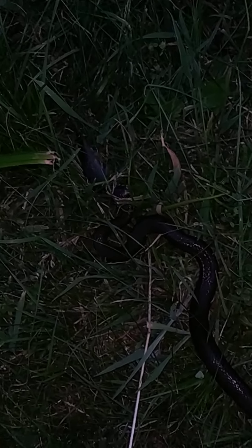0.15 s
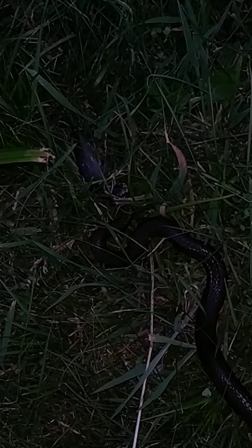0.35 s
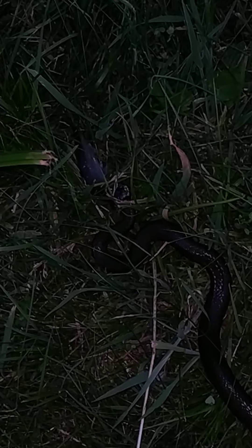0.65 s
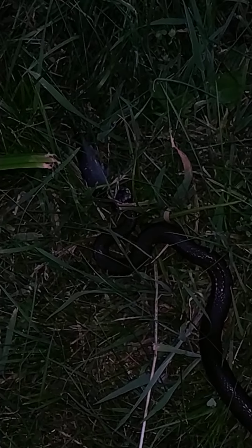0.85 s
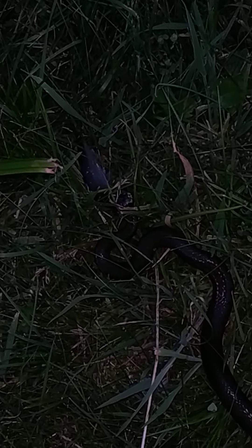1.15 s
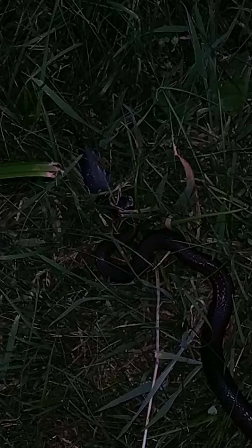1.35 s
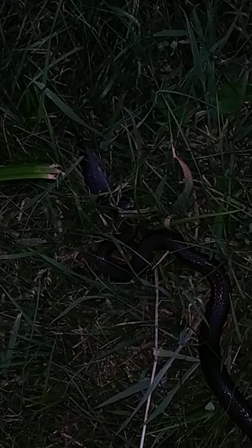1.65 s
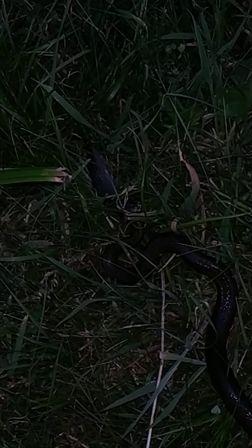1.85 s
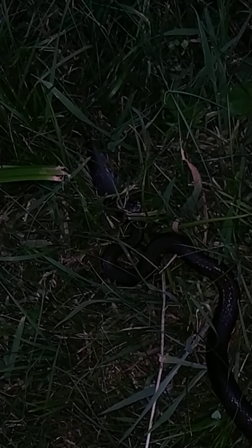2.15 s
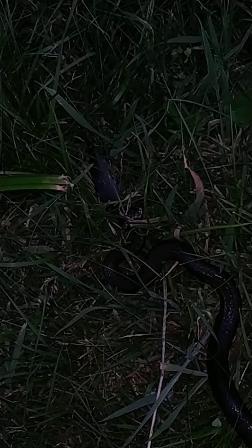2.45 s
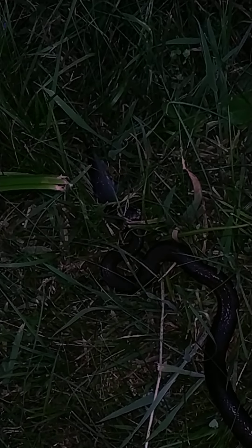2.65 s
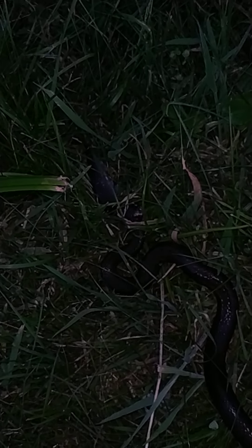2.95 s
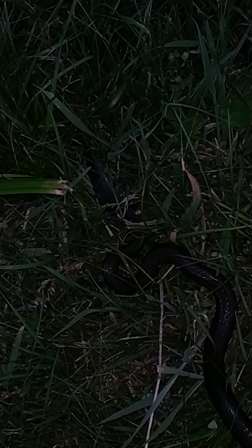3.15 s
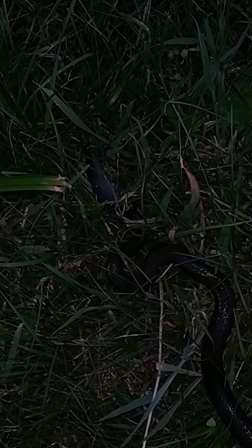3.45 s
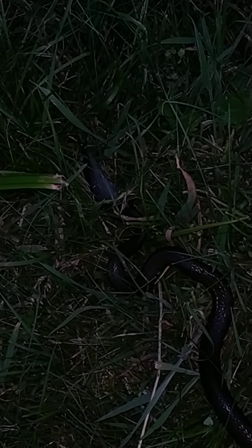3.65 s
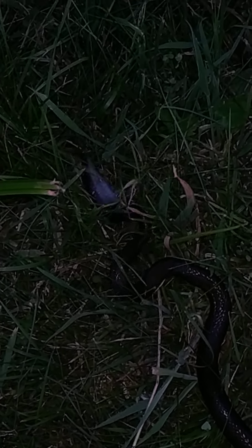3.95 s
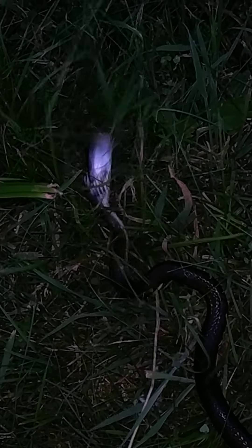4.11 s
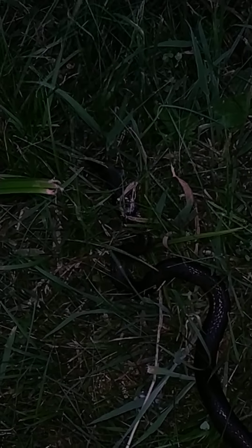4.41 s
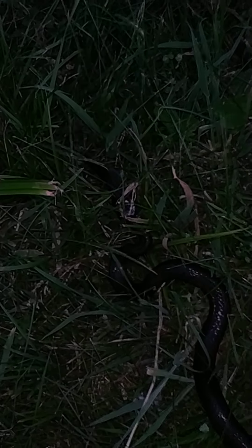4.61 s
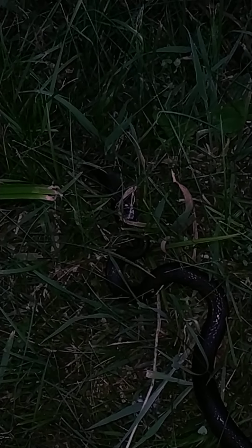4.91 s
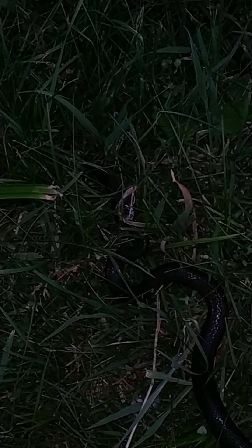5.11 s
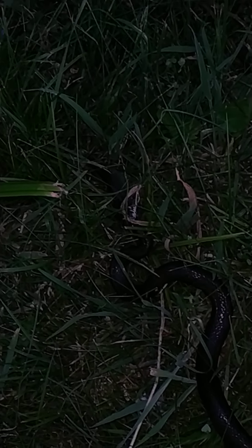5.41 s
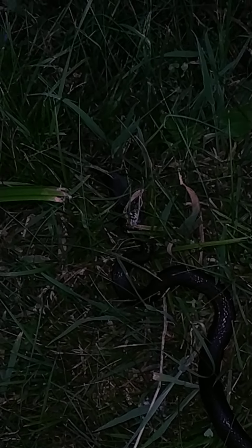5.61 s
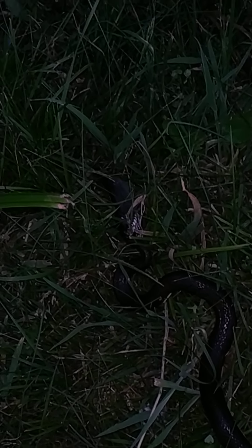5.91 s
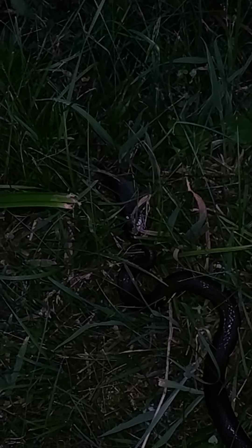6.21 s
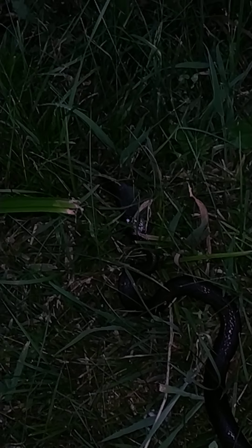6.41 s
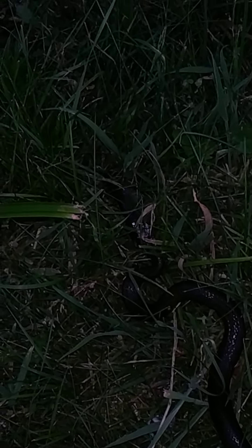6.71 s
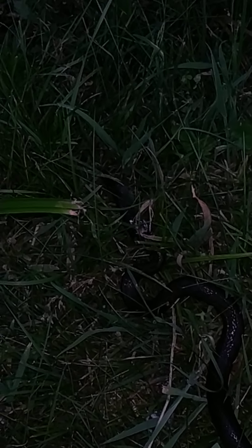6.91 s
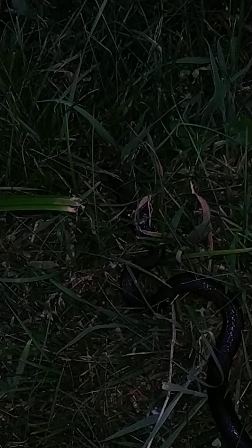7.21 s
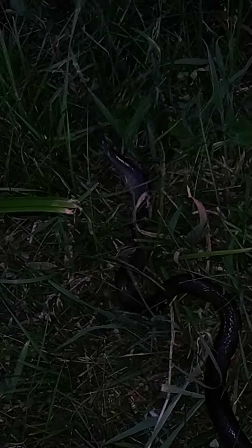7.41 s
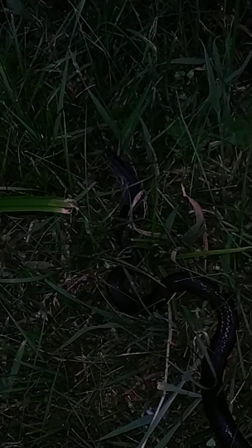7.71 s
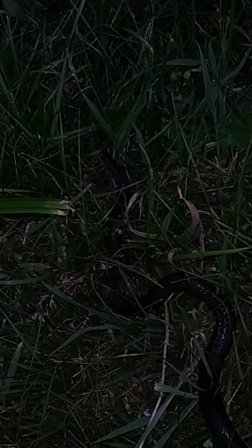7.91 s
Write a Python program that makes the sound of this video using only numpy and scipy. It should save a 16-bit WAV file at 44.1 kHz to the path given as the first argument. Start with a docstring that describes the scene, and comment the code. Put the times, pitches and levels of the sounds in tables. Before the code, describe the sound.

Close, irregular rustling and crackling of a snake in damp grass, busy at first, then sparse, with one late burst over faint outdoor hush.

```python
"""A snake pushes through grass and dry stems on soft, damp ground, close to the microphone.
Each shove drags blades over its scales: random clicks and hiss, filtered into a grainy rustle.
Stems snap as filtered bursts with a hard crack; wet soil squelches as short sine tones that rise in pitch.
Behind it lie a quiet outdoor hush of filtered noise and a faint far whistle, perhaps a bird, of wavering sines."""
import sys
import numpy as np
from scipy import signal
from scipy.io import wavfile

SR = 44100
rng = np.random.default_rng(int(sys.argv[2]) if len(sys.argv) > 2 else 0)


def store_pcm(level_fs):
    """Save levels as 16-bit WAV."""
    pcm = np.round(np.clip(level_fs, -1, 1) * 32767).astype(np.int16)
    wavfile.write(sys.argv[1], SR, np.atleast_2d(pcm).T)


N = 355446

# The snake's shoves, each a build-up, a hold and a release; levels are relative:
# (start of hold [s], build-up [s], hold [s], release [s],
#  brushing of blades [dB], crush of litter [dB], glide of scales [dB])
SHOVES = [(0, 0.046, 0.054, 0.19, -55, -55, -55), (0.21, .14, 0.19, 0.33, -41, -40, -46),
          (0.527, .04, 0.055, 0.17, -48.5, -54, -52), (0.791, 0.084, 0.027, 0.088, -45.5, -45.5, -58),
          (0.902, 0.091, 0.079, 0.12, -56, -56, -63), (1.237, 0.16, 0.0096, 0.46, -48, -53, -56),
          (1.464, 0.072, 0.12, 0.22, -45.5, -54, -55), (1.766, 0.11, 0.36, 0.1, -56, -60, -63.5),
          (2.056, 0.017, 0.01, 0.11, -67, -46, -67), (2.21, 0.09, 0.075, 0.13, -55, -55.5, -58.5),
          (4.06, 0.097, 0.056, 0.17, -57.5, -67, -56), (4.562, 0.026, 0.0304, .3, -54.5, -58, -63),
          (6.614, 0.078, 0.045, 0.13, -53, -53, -51), (6.754, 0.25, 0.093, 0.14, -39.5, -38.5, -46),
          (6.9, 0.033, 0.07, 0.062, -46.5, -45.5, -49), (7.323, 0.13, 0.043, 0.083, -54.5, -62, -56.5),
          (7.521, 0.6, 0.079, 0.085, -59.5, -60, -64)]
# Stems snapping at set times, some loud, some faint, levels relative to each other;
# positive left-right is louder on the left:
# (time [s], level [dB], pitch [Hz], bandwidth [octaves], time to fade 60 dB [s], left-right [dB])
TIMED_SNAPS = [(0.0332, -47, 5940, 3.3, .035, 8), (0.214, -31.5, 2772, 0.62, 0.015, 2),
               (0.2352, -46, 5980, 1.54, 0.034, 0), (0.262, -36.5, 8430, 1.7, .035, 4),
               (0.275, -37, 2670, 0.46, .025, 0), (0.409, -39, 7500, 0.63, .03, 0),
               (0.449, -33, 9050, 1.6, 0.06, -2), (0.4595, -35, 10000, 0.91, 0.041, -1.5),
               (0.7245, -35.5, 4300, 0.94, 0.08, 0), (0.782, -31.5, 2910, 0.51, 0.024, 2.5),
               (0.967, -46.5, 2830, 1.14, 0.019, 4), (0.985, -44.5, 2695, 0.87, .03, 0),
               (1.172, -41, 5490, 2.1, 0.037, 0), (1.2266, -41, 12600, .8, 0.055, -2),
               (1.4338, -29, 5440, 2.13, 0.025, 2), (1.479, -31, 3800, 1.5, 0.028, -1),
               (1.5065, -31.5, 5190, 2.7, 0.046, -2), (1.536, -39, 4006, 1.97, .02, 0),
               (1.5515, -35.5, 6460, 2.6, .022, -.5), (1.661, -41.5, 3420, 1.1, 0.054, 3),
               (1.703, -42.5, 5890, 0.25, 0.025, -1), (1.766, -44.5, 3520, 2.25, 0.026, 1),
               (1.8704, -42, 3650, 1.3, .045, 3), (2.053, -40.5, 8250, 1.35, 0.061, -2.5),
               (2.1236, -46, 2810, 1.5, 0.024, 0), (2.2068, -38, 5390, 1.95, 0.041, -2),
               (2.2224, -42, 6920, 0.72, .015, -1), (2.2884, -44, 6100, 0.94, 0.013, -1),
               (2.324, -43, 6700, 0.5, .012, -0.5), (3.0755, -44, 4960, 0.42, 0.014, 0),
               (3.0974, -54, 2480, 1.9, 0.043, 2), (3.1385, -50.5, 3500, 3.3, 0.052, -1),
               (3.2295, -51, 3320, 1, .014, 0), (3.235, -41.5, 8950, 0.63, 0.028, -2),
               (4.052, -50, 8300, 0.84, 0.018, 5), (4.558, -35.5, 2530, 2.07, 0.021, 1),
               (4.5665, -39, 3200, 0.43, 0.012, 5), (4.575, -37.5, 2980, 2.5, .022, -3),
               (4.589, -39.5, 5220, 0.5, 0.082, 2), (4.6501, -36, 6370, 0.57, 0.023, 1),
               (4.77, -49.5, 4940, 2.3, 0.031, -1), (5.284, -34.5, 9200, 0.83, 0.055, -5),
               (5.2912, -25.5, 6370, 0.29, 0.011, 2.5), (5.36, -49, 8900, 0.66, .026, -1),
               (5.7941, -38.5, 11250, 0.45, 0.0081, -1), (6.3109, -48.5, 9080, 1.5, 0.036, 1),
               (6.616, -45, 5010, 2.9, 0.026, 9), (6.7755, -30, 2787, 2, 0.019, -1),
               (6.8884, -28.5, 3965, 2, 0.028, -2), (6.899, -31.5, 2620, 2.6, 0.012, -2),
               (6.9196, -29, 2830, 1.25, 0.021, 0), (7.099, -48.5, 7860, 2.2, 0.079, -5),
               (7.2735, -50, 2570, 2.2, 0.02, 5), (7.324, -45, 7770, 0.41, 0.013, 0),
               (7.364, -55, 2945, 2.9, 0.053, 7.5), (7.5688, -44, 3470, 1.5, 0.07, 0)]
# Air pockets opening in the wet soil at set times, strong and faint, levels relative to each other:
# (time [s], starting pitch [Hz], peak level [dB], time to fade 60 dB [s])
TIMED_SQUELCHES = [(0.2235, 785, -32.5, 0.024), (0.2345, 545, -29.5, .018), (0.2394, 714, -29, 0.016),
                   (0.2505, 757, -22.5, 0.012), (0.264, 440, -39, 0.03), (0.279, 770, -35, 0.016),
                   (0.303, 1220, -31, 0.016), (0.333, 1270, -38, 0.016), (0.3445, 940, -27, .008),
                   (0.3628, 930, -23, 0.0087), (0.372, 826, -25.5, 0.014), (0.3798, 822, -20, 0.01),
                   (0.39, 760, -23, 0.01), (0.4015, 780, -22, 0.0082), (0.4216, 650, -30, 0.016),
                   (0.4311, 587, -32, 0.034), (0.459, 976, -29.5, 0.012), (0.467, 1190, -32, .011),
                   (0.4812, 1110, -33.5, 0.0098), (0.5495, 987, -35.5, 0.026), (0.570, 1030, -36.5, .014),
                   (0.7848, 1024, -28.5, 0.02), (0.7946, 615, -30, 0.041), (0.812, 1145, -35.5, 0.014),
                   (0.8738, 774, -34.5, 0.0066), (0.9208, 839, -39.5, 0.012), (0.9505, 990, -40.5, 0.011),
                   (0.968, 950, -36, 0.014), (1.1475, 1100, -43, 0.012), (1.173, 1337, -43.5, 0.017),
                   (1.251, 1250, -34, 0.037), (1.326, 2230, -39.5, 0.017), (1.359, 1221, -40, 0.0097),
                   (1.3853, 1210, -34.5, 0.013), (1.4435, 854, -39.5, 0.016), (1.4525, 1437, -38, 0.014),
                   (1.4837, 950, -33, 0.023), (1.5235, 965, -37, 0.0072), (1.5345, 1270, -33.5, 0.0096),
                   (1.549, 1010, -35, 0.012), (1.7725, 1854, -32.5, 0.017), (1.776, 705, -43, 0.018),
                   (1.8275, 1530, -37, 0.02), (1.8602, 1156, -40.5, 0.043), (1.935, 1900, -41.5, 0.018),
                   (1.943, 963, -46.5, .042), (1.9959, 1734, -33.5, 0.023), (2.039, 2110, -32.5, 0.0095),
                   (2.0638, 1045, -24.5, 0.011), (2.0652, 1855, -26.5, 0.012), (2.2007, 1513, -38, 0.013),
                   (2.217, 1765, -41, .02), (2.237, 1163, -48, .028), (2.2825, 1170, -28, 0.0068),
                   (4.558, 670, -42.5, 0.039), (4.559, 1890, -33, 0.0096), (4.7086, 1560, -48.5, 0.026),
                   (5.002, 463, -45, 0.012), (5.078, 600, -52, 0.12), (5.282, 550, -42.5, 0.094),
                   (6.552, 1976, -48.5, 0.02), (6.7635, 610, -33.5, 0.021), (6.7755, 790, -26, 0.013),
                   (6.7992, 729, -29, 0.014), (6.83, 684, -36, .014), (6.854, 687, -39, 0.013),
                   (6.8985, 610, -33.5, 0.023), (6.923, 660, -37, 0.019), (6.9528, 700, -30, 0.0079),
                   (7.5692, 1947, -44, 0.025), (7.611, 802, -52.5, 0.034)]
# The far whistles, levels before their fading:
# (time [s], length [s], starting pitch [Hz], final pitch [Hz], level [dB])
FAR_WHISTLES = [(6.314, 0.098, 3130, 3470, -64), (7.114, 0.18, 2870, 3030, -63),
                (7.845, 0.055, 2760, 2910, -66), (7.944, 0.14, 2950, 2970, -65.5)]
# Tone colour of the crushed litter: (frequency [Hz], relative level per Hz [dB])
LITTER_SPECTRUM = [(130, -33), (210, -4.5), (340, -13), (560, -3), (700, 0), (1300, 4), (1750, 1.5),
                   (2500, 1.5), (3600, -8), (6000, -24)]
# Tone colour of the brushed blades: (frequency [Hz], relative level per Hz [dB])
BLADE_SPECTRUM = [(1200, -15), (2400, 1.5), (3400, -1), (4500, -1.5), (6300, 4), (9000, -0.5), (12000, -7),
                  (16000, -10)]
# Tone colour of the outdoor hush: (frequency [Hz], relative level per Hz [dB])
HUSH_SPECTRUM = [(30, -48), (80, -26), (130, -33), (195, -1.5), (280, -2), (450, -6.5), (750, -8.5),
                 (1500, -11.5), (5000, -13), (15500, -12)]
# How alike left and right are for the close sounds: (frequency [Hz], correlation [-1 to 1])
NEAR_LIKENESS = [(150, 0.32), (400, 0.65), (950, 0.81), (2400, 0.53), (6000, 0), (15000, 0.19)]
# How alike left and right are for the hush: (frequency [Hz], correlation [-1 to 1])
HUSH_LIKENESS = [(60, 0.47), (380, 0.18), (950, 0), (15000, 0.004)]

TIME = np.arange(N) / SR   # seconds
CUTOFF_HZ = 15900
BAND_EDGES_HZ = np.geomspace(28, 17000, 23)
SHOVE_SWING_DB = 20   # how far the brushing climbs over a build-up and sinks over a release
CRUSH_STEEPNESS = 1.5   # the litter gives way only under weight, so it swells and fades faster
PRESSED_DB = -63   # the soil starts to give at this level of crush
# Pitch of the soil's hollows under a light touch, its fall with weight, and its lowest value
LIGHT_CAVITY_HZ, CAVITY_OCTAVES_PER_DB, LARGEST_CAVITY_HZ = 1794, 0.14, 797
SWELL_CYCLES = 1.17   # a pocket opens over about this many cycles
THIN_STEM_OCTAVES, THIN_STEM_T60_S = 0.52, 0.025   # bandwidth and ring of the random thin-stem snaps
STEM_RING_OCTAVES = 0.134   # width of the resonance of a broken stem
THICK_STEM_HZ, THUD_DB_PER_OCTAVE = 3010, 11   # thinner, higher stems knock the ground less


def shoves():
    """Levels of brushing, crushing and gliding: each shove builds, holds and lets go; overlaps add in power."""
    power = np.full((3, N), 1e-12)
    for s, build, hold, release, brush_db, crush_db, glide_db in SHOVES:
        before = np.maximum(s - TIME, 0) / build
        after = np.maximum(TIME - s - hold, 0) / release
        slack = before + after
        near = slack < 3
        slack_db = SHOVE_SWING_DB * slack[near]
        levels_db = [brush_db - slack_db, crush_db - CRUSH_STEEPNESS * slack_db, glide_db - slack_db]
        power[:, near] += from_db(levels_db) ** 2
    return 10 * np.log10(power)


def rustle(level_db, spectrum, per_s, spread_db, slide_db, catch_db, catch_rate, patchy_db):
    """Tiny slips over a smooth sliding hiss; they clump as blades catch and let go."""
    sources = []
    for _ in range(2):
        slips = grains(per_s, spread_db, size=N)
        hiss = from_db(slide_db) * rng.standard_normal((2, N))
        sources.append(slips + hiss)
    texture = coloured(sources, spectrum, NEAR_LIKENESS, patchy_db, patch_rate=70)
    clumped = texture * from_db(catch_db * drift(catch_rate))
    return from_db(level_db) * rms_one(clumped)


def crackles(brush_db, gain_db, low_hz, high_hz, width, spread_db, count):
    """Small dry blades flick past the scales under a firm push, each with a brief tick of its own pitch."""
    out, t = np.zeros((2, N)), TIME[:SR // 40]
    firm_db, t60 = -55, .025
    for when, pitch, size, side in rng.random((count, 4)):
        hz, i = low_hz * (high_hz / low_hz) ** pitch, int(when * N)
        if brush_db[i] > firm_db:
            noise = widen(rng.standard_normal((2, len(t))), at_hz(NEAR_LIKENESS, hz))
            burst = noise * from_db(-60 * t / t60)
            tick = rms_one(band(burst, hz * (1 - width), hz * (1 + width)))
            level = from_db(brush_db[i] + gain_db - spread_db * size)
            add(out, i / SR, level * pan(10 * (side - .5)) * tick)
    return out


def scale_hiss(glide_db, low_hz, flutter_db, per_s, spread_db):
    """The edges of the scales tick past the blades: a thin, airy crackle that comes in spurts."""
    ticks = rms_one(band(grains(per_s, spread_db, size=N), low_hz, CUTOFF_HZ))
    return from_db(glide_db + flutter_db * drift(90)) * ticks


def drag(crush_db, gain_db, half_width_octaves, wander_octaves, stick_db):
    """The belly sticks and slips; the slips ring a hollow whose pitch wanders and falls with weight."""
    centre_hz = cavity_hz(crush_db) * 2 ** (wander_octaves * drift(70))
    slips = widen(grains(500, 2, size=N), at_hz(NEAR_LIKENESS, 950))
    scrape = 0
    # Seven fixed bands fade in and out as the hollow's pitch passes them
    for hz in np.geomspace(540, 2200, 7):
        nearness = np.exp(-(np.log2(hz / centre_hz) / half_width_octaves) ** 2)
        scrape = scrape + nearness * band(slips, hz * .87, hz * 1.15)
    return from_db(crush_db + gain_db + stick_db * drift(45)) * rms_one(scrape)


def cavity_hz(crush_db):
    """Pitch of the hollows: more weight opens larger, lower ones, down to the largest that the soil holds."""
    weight_db = np.maximum(crush_db - PRESSED_DB, 0)
    hz = LIGHT_CAVITY_HZ * 2 ** (-CAVITY_OCTAVES_PER_DB * weight_db)
    return np.maximum(hz, LARGEST_CAVITY_HZ)


def snaps(rows, gain_db, crack_db, ring_db, splinter_db, thud_db, tail_db, tail_t60, attack_s):
    """A stem cracks hard amid tearing fibres and rings at its pitch, then its neighbours shiver."""
    out, t = np.zeros((2, N)), TIME[:SR // 6]
    for s, db, hz, octaves, t60, side_db in rows:
        half_band, half_ring = 2 ** (octaves / 2), 2 ** (STEM_RING_OCTAVES / 2)
        bend_s = attack_s * THICK_STEM_HZ / hz   # thick stems bend for longer before they break
        shiver = from_db(tail_db - 60 * t / tail_t60)
        fade = (1 - np.exp(-t / bend_s)) * (from_db(-60 * t / t60) + shiver)
        cracks = widen(grains(7000, 1.5, size=len(t)), at_hz(NEAR_LIKENESS, hz)) * fade
        cracks[:, int(bend_s * SR)] += from_db(crack_db)
        cracks = stem_echo(cracks, lag_s=0.001396, share=1.0)

        stem = rms_one(band(cracks, hz / half_band, hz * half_band, order=3))
        ring = from_db(ring_db) * rms_one(band(cracks, hz / half_ring, hz * half_ring))
        splinters = from_db(splinter_db) * rms_one(band(cracks, hz / half_band, CUTOFF_HZ, order=3))
        octaves_thinner = np.log2(max(hz / THICK_STEM_HZ, 1))
        thud_gain = from_db(thud_db - THUD_DB_PER_OCTAVE * octaves_thinner)
        thud = thud_gain * rms_one(band(cracks, 410, 2600))
        add(out, s, from_db(db + gain_db) * pan(side_db) * (stem + ring + splinters + thud))
    return out


def random_snaps(brush_db, gain_db, ceiling_db, low_hz, high_hz, spread_db, count):
    """Thin stems give way at random wherever the body is pushing; one row for each, as for the timed ones."""
    rows, moving_db = [], -57
    for when, pitch, size, side in rng.random((count, 4)):
        push_db = brush_db[int(when * N)]
        if push_db > moving_db:
            db = min(push_db + gain_db, ceiling_db) - spread_db * size
            hz = low_hz * (high_hz / low_hz) ** pitch
            rows.append((when * N / SR, db, hz, THIN_STEM_OCTAVES, THIN_STEM_T60_S, 10 * (side - .5)))
    return rows


def stem_echo(x, lag_s, share):
    """A reflection off a neighbouring stem combs the spectrum, differently at each side."""
    lags = rng.uniform(lag_s / 4, lag_s, 2)
    t = TIME[:x.shape[1]]
    return np.array([side + share * np.interp(t - lag, t, side, left=0) for side, lag in zip(x, lags)])


def squelches(rows, gain_db, rise, width, spatter_db, spatter_t60):
    """Wet pockets: longer ones climb further in pitch; shorter ones burst with a stronger wet spatter."""
    out, t = np.zeros((2, N)), TIME[:SR // 12]
    for (s, hz, db, t60), side in zip(rows, rng.standard_normal(len(rows))):
        pocket = bubble(hz, t60, rise * np.sqrt(t60 / 0.121))
        add(out, s, from_db(db + gain_db) * pan(width * side) * pocket)
        drops = widen(grains(1500, 1.9, size=len(t)), at_hz(NEAR_LIKENESS, hz))
        drops = drops * from_db(-60 * t / spatter_t60)
        spatter = rms_one(band(drops, hz * 0.85, hz * 1.38))
        add(out, s, from_db(db + spatter_db - 220 * t60) * spatter)
    return out


def random_squelches(crush_db, gain_db, ceiling_db, spread_db, t60, count):
    """Pockets open at random under the body, within half an octave of the pitch of the hollows."""
    rows = []
    for when, pitch, size in rng.random((count, 3)):
        weight_db = crush_db[int(when * N)]
        if weight_db > PRESSED_DB:
            hz = cavity_hz(weight_db) * 2 ** (pitch - .5)
            db = min(weight_db + gain_db, ceiling_db) - spread_db * size
            rows.append((when * N / SR, hz, db, t60))
    return rows


def seeping(crush_db, gain_db, low_hz, high_hz, cycles, spread_db, count):
    """Many small pockets burst at random, louder where the litter is pressed harder."""
    out = np.zeros((2, N))
    for when, pitch, size, side in rng.random((count, 4)):
        hz, i = low_hz * (high_hz / low_hz) ** pitch, int(when * N)
        db = crush_db[i] + gain_db - spread_db * size
        add(out, i / SR, from_db(db) * pan(12 * (side - .5)) * bubble(hz, cycles / hz, rise=2.34))
    return out


def bubble(hz, t60, rise):
    """An air pocket swells, rings and climbs in pitch; longer-lived ones hold more, then die more abruptly."""
    t = TIME[:int(t60 * SR)]
    pitch = hz * (1 + rise * (t / t60) ** 2)
    swell = 1 - np.exp(-(t * hz / SWELL_CYCLES) ** 2)
    fade = from_db(-60 * (t / t60) ** (1.85 + 2.5 * t60))
    return np.sin(2 * np.pi * np.cumsum(pitch) / SR) * swell * fade


def undergrowth(x, t60, wet_db):
    """Stems and ground scatter a short diffuse tail, different at each side."""
    t = TIME[:SR // 4]
    noise = band(rng.standard_normal((2, len(t))), 390, 8300, order=1)
    scatter = noise * from_db(-60 * t / t60) * (t > .002)   # the tail starts after 2 ms
    scatter /= np.sqrt(np.sum(scatter ** 2, axis=1, keepdims=True))
    return x + from_db(wet_db) * signal.fftconvolve(x, scatter, axes=1)[:, :N]


def outdoor_hush(level_db, flutter_db):
    """Quiet, nearly steady noise, shaped band by band and spread wide."""
    noise = rng.standard_normal((2, 2, N))
    return from_db(level_db) * coloured(noise, HUSH_SPECTRUM, HUSH_LIKENESS, flutter_db, patch_rate=14)


def whistles(waver, fading_db):
    """Thin, wavering notes from far away that fade in and out on the air."""
    out = np.zeros((2, N))
    for s, length, first_hz, last_hz, db in FAR_WHISTLES:
        size = int(length * SR)
        wander = np.array([drift(114.0)[:size], drift(118.0)[:size]])   # left and right waver apart
        pitch = np.linspace(first_hz, last_hz, size) * (1 + waver * wander)
        arch = np.sqrt(np.abs(np.sin(np.linspace(0, np.pi, size))))
        swell = from_db(db + fading_db * drift(36.0)[:size]) * arch
        add(out, s, swell * np.sin(2 * np.pi * np.cumsum(pitch, axis=1) / SR))
    return out


def from_db(db):
    """Turn decibels into a gain."""
    return 10 ** (np.asarray(db) / 20)


def rms_one(x):
    """Scale each channel to an rms (average strength) of one."""
    return x / np.sqrt(np.mean(x ** 2, axis=-1, keepdims=True) + 1e-20)


def at_hz(points, hz):
    """Read a table of values against frequency on a log-frequency axis."""
    table = np.array(points)
    return np.interp(np.log(hz), np.log(table[:, 0]), table[:, 1])


def drift(rate):
    """A random wander of rms one: straight lines between `rate` random points a second."""
    knots = rng.standard_normal(int(N / SR * rate) + 3)
    return rms_one(np.interp(TIME * rate, np.arange(len(knots)), knots))


def band(x, low, high, order=2):
    """Band-pass filter: keep the frequencies between two limits in Hz."""
    high = min(max(high, low * 1.1), SR * .45)
    low = min(low, high * .9)
    return signal.sosfilt(signal.butter(order, [low, high], "band", fs=SR, output="sos"), x + 1e-18)


def widen(pair, alike):
    """Two unrelated signals become left and right with the given correlation."""
    alike = np.clip(alike, -1, 1)
    middle = np.sqrt(1 + alike) * pair[0]
    sides = np.sqrt(1 - alike) * pair[1] * np.array([[1], [-1]])
    return middle + sides


def pan(db):
    """Left and right gains for a level difference; positive is louder on the left."""
    return from_db(np.array([[db], [-db]]) / 2)


def add(out, s, sound):
    """Mix a sound in at a time in seconds."""
    i = max(round(s * SR), 0)
    out[:, i:i + sound.shape[1]] += sound[:, :N - i]


def grains(per_s, spread_db, size):
    """Two rows of random clicks of rms one; a wider spread makes a few stand out."""
    born = rng.random((2, size)) < per_s / SR
    clicks, count = np.zeros((2, size)), born.sum()
    heights = from_db(spread_db * np.minimum(rng.exponential(1, count), 4))
    clicks[born] = heights * rng.choice([-1, 1], count)
    return rms_one(clicks)


def coloured(sources, spectrum, likeness, patchy_db, patch_rate):
    """Sources take turns in a bank of bands, each with its own level, flutter and stereo width; rms one."""
    out = np.zeros((2, N))
    for k, (low, high) in enumerate(zip(BAND_EDGES_HZ, BAND_EDGES_HZ[1:])):
        hz = np.sqrt(low * high)
        if spectrum[0][0] / 2 < hz < spectrum[-1][0] * 2:
            gain = from_db(at_hz(spectrum, hz) + patchy_db * drift(patch_rate))
            out += gain * widen(band(sources[k % 2], low, high), at_hz(likeness, hz))
    return rms_one(out)


def scene():
    """The snake's shoves, snaps and squelches over the hush and the far whistles."""
    brush_db, crush_db, glide_db = shoves()

    blades = rustle(brush_db - 2.0, BLADE_SPECTRUM, per_s=1300, spread_db=0.0, slide_db=-4.5,
                    catch_db=2.5, catch_rate=130, patchy_db=3.5)
    blades += crackles(brush_db, gain_db=-7.0, low_hz=2060, high_hz=15100, width=0.086,
                       spread_db=7.5, count=1500)
    blades += scale_hiss(glide_db, low_hz=8150, flutter_db=5.0, per_s=1800, spread_db=3)

    litter = rustle(crush_db - 5.5, LITTER_SPECTRUM, per_s=1000, spread_db=4.5, slide_db=-10.0,
                    catch_db=2.4, catch_rate=98, patchy_db=4.5)
    litter += drag(crush_db, gain_db=-7.5, half_width_octaves=0.34, wander_octaves=0.28, stick_db=3)

    thin_stems = random_snaps(brush_db, gain_db=3.5, ceiling_db=-44.5, low_hz=2146, high_hz=11600,
                              spread_db=-0.5, count=170)
    stems = snaps(TIMED_SNAPS + thin_stems, gain_db=-16.5, crack_db=6.5, ring_db=-12.5, splinter_db=-7.5,
                  thud_db=-10.5, tail_db=-28, tail_t60=0.069, attack_s=0.0022)

    pockets = random_squelches(crush_db, gain_db=11.5, ceiling_db=-32, spread_db=3.0, t60=0.014, count=130)
    soil = squelches(TIMED_SQUELCHES + pockets, gain_db=-1.0, rise=3.8, width=1.5,
                     spatter_db=-21.5, spatter_t60=0.027)
    soil += seeping(crush_db, gain_db=3.0, low_hz=636, high_hz=2810, cycles=13.3, spread_db=18.0, count=650)

    # The snake's head works its way from the right of the microphone to the left
    side_db = np.linspace(-1.0, 2.5, N)
    moving = (litter + blades + soil) * from_db(np.array([side_db, -side_db]) / 2)
    near = undergrowth(moving + stems, t60=0.074, wet_db=-12.5)
    hush = outdoor_hush(level_db=-57.5, flutter_db=.6)
    return near + hush + whistles(waver=0.01544, fading_db=3.0)


def record(dry):
    """A steep low-pass filter removes the very top of the treble."""
    return signal.sosfilt(signal.ellip(12, .1, 70, CUTOFF_HZ, fs=SR, output="sos"), dry)


dry = scene()
out = record(dry)
store_pcm(out)
```